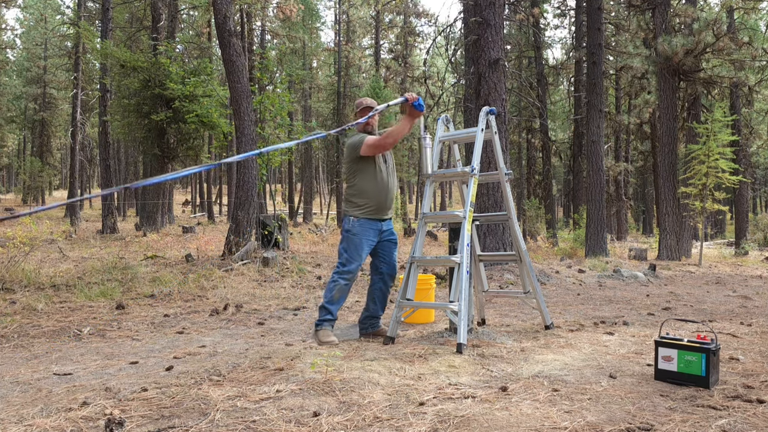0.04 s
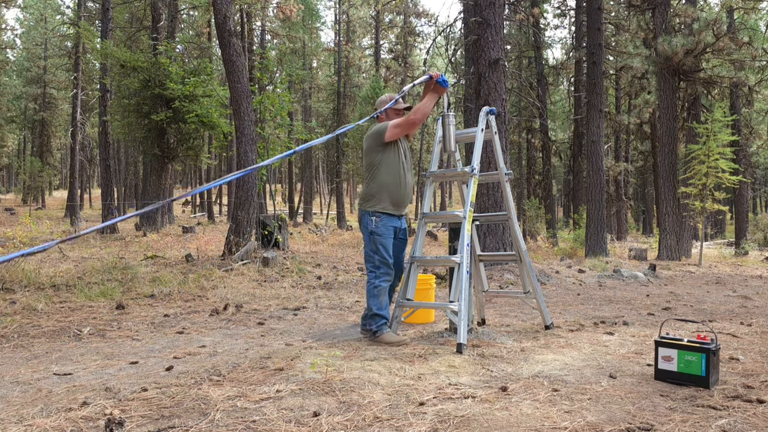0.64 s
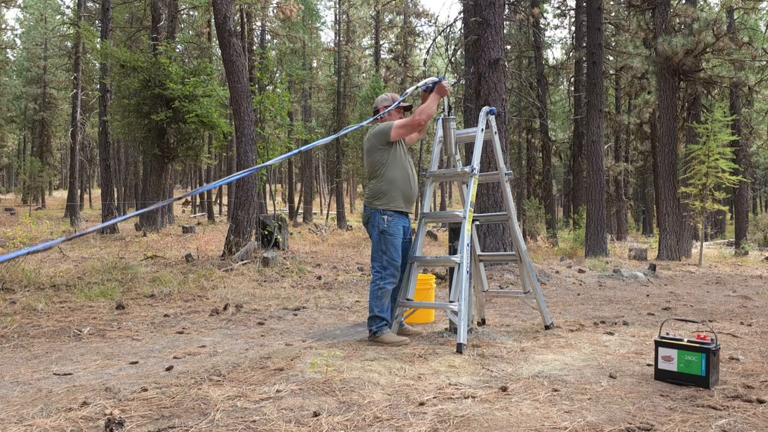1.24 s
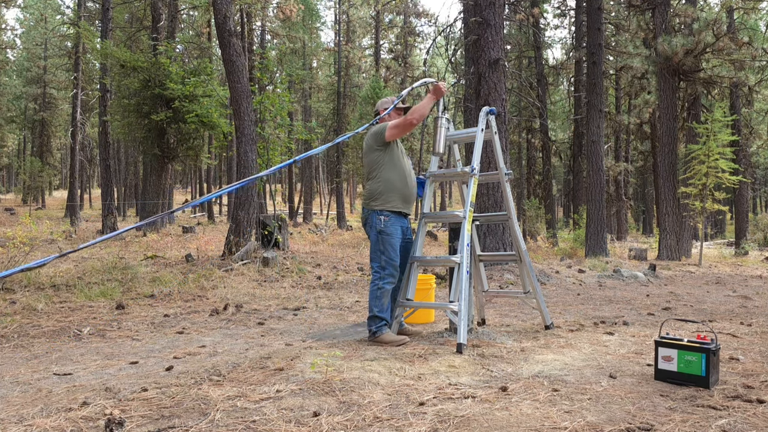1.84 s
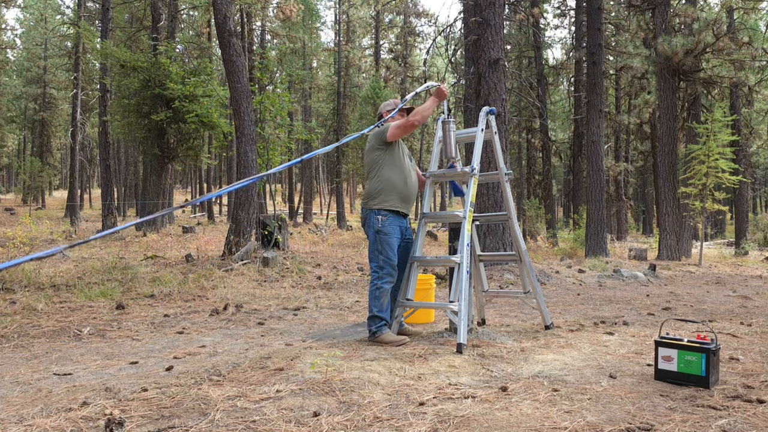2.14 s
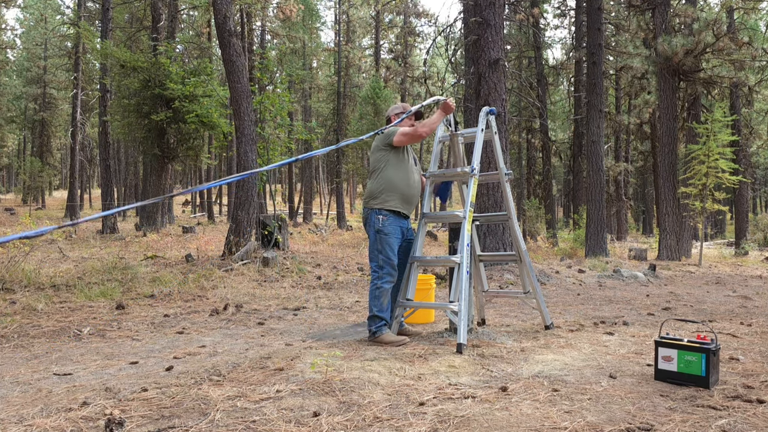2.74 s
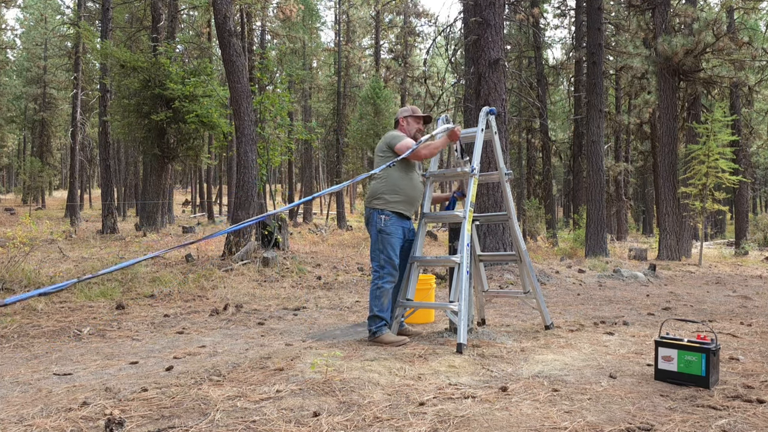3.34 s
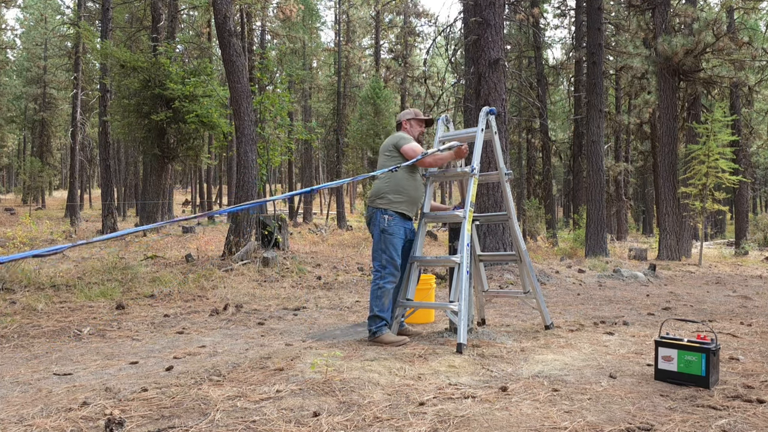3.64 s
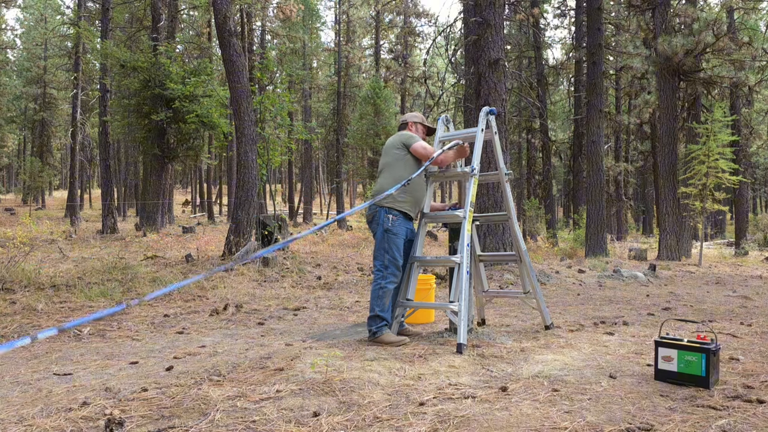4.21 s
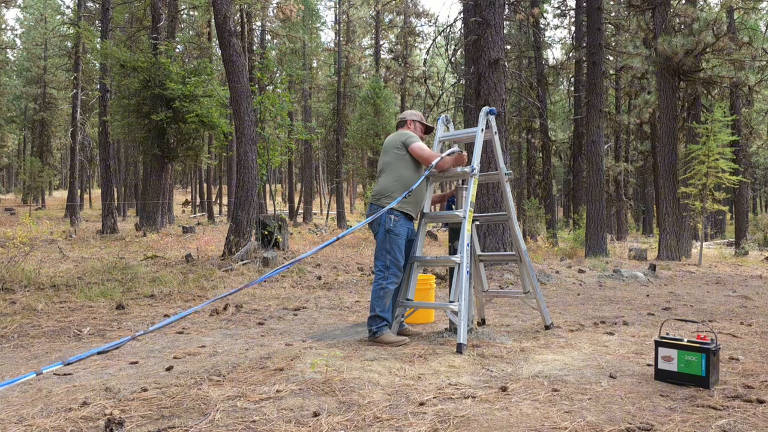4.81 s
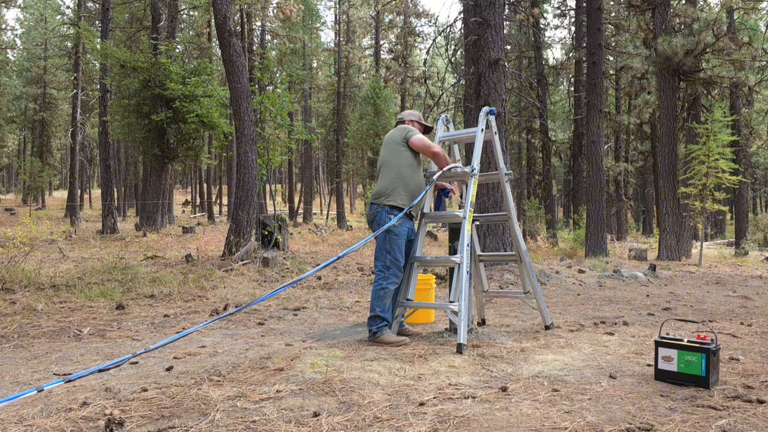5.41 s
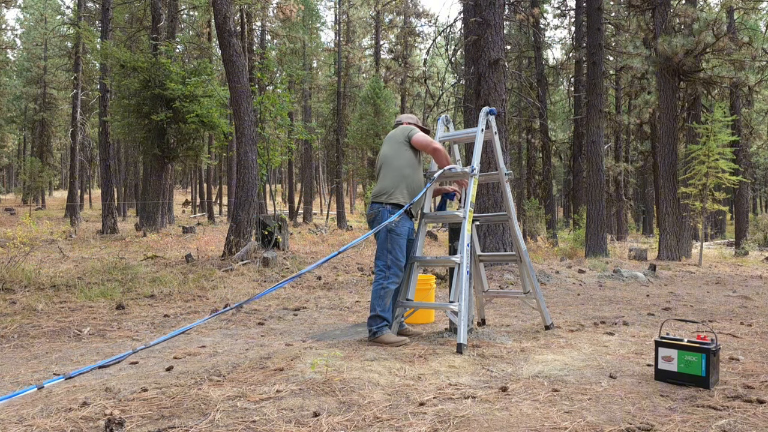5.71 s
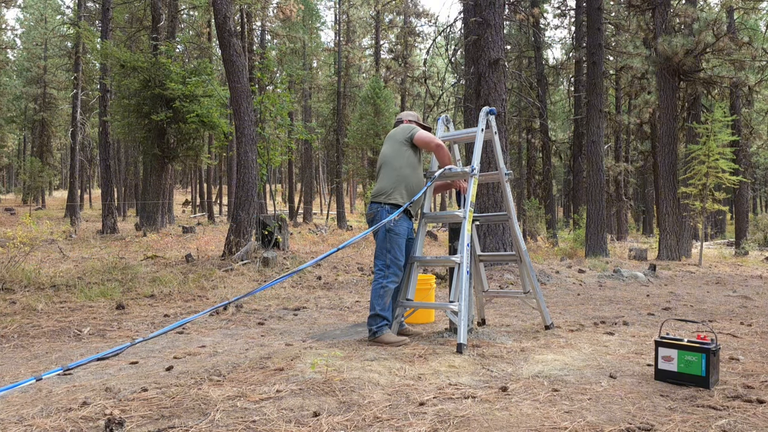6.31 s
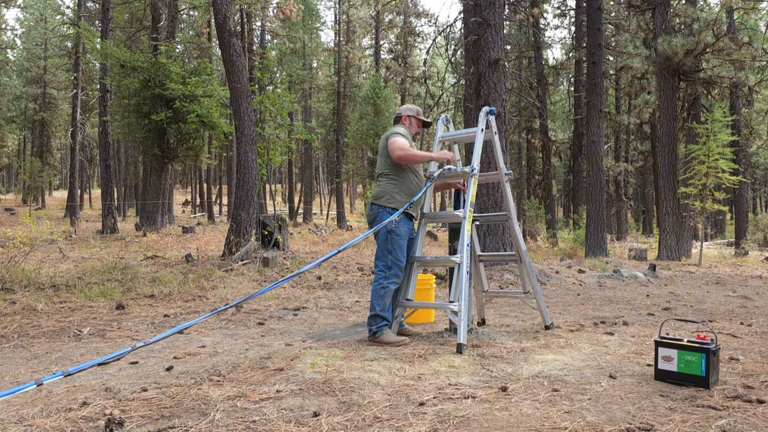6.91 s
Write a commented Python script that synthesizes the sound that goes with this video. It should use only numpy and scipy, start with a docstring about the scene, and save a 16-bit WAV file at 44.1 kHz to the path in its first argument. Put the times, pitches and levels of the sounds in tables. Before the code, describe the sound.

In a quiet forest with low wind, a hose is fed into a steel well pipe a few metres away and a little left of the microphone. Its fittings first strike an aluminium ladder, once hard and then in a lighter clatter, with faint hose swishes, squeaks and a boot scuff around them. Then the pipe rings with a clank and light clinks, and the air inside booms softly. The trees return a thin echo.

```python
"""Fittings clack on an aluminium ladder as a hose and cable bundle is fed by hand into a steel well casing.
They clink and rub on the casing, whose air column booms softly; the hose swishes and squeaks as it slides.
The well is in a pine forest, a few metres from a stereo microphone and a little to the left.
A boot scuffs the dry ground, the trunks throw back a thin echo, and low wind lies under everything."""
import sys
import numpy as np
from scipy import signal
from scipy.fft import rfft, irfft, next_fast_len
from scipy.io import wavfile

SR = 44100
rng = np.random.default_rng(int(sys.argv[2]) if len(sys.argv) > 2 else 0)


def generate_wav(sig):
    """Save sig (samples, or channels by samples) to the path in sys.argv[1] as 16-bit PCM at SR."""
    pcm = np.round(np.clip(np.atleast_2d(sig).T, -1, 1) * 32767).astype(np.int16)
    wavfile.write(sys.argv[1], SR, pcm)


N = 311346

# left-right likeness at the microphone, for near and for diffuse sound: f/Hz, correlation
NEAR = [(100, 0.97), (1200, 0.77), (3000, .82), (7000, 1), (14000, 0.18)]
DIFFUSE = [(60, 0.98), (300, 0.84), (1000, 0.44), (3000, .15), (12000, 0.05)]
# bending modes of the steel casing: f/Hz, level/dB, t60/s
CASING_MODES = [(614, -1, 0.44), (779.7, 2.5, 0.031), (1043, 2.5, 0.036), (1234, -7.5, 0.088),
                (1330, -30, 0.097), (1743, -1.5, 0.23), (2253, -22, 0.14), (2490, -31, 0.15),
                (3280, -14, 0.1), (4080, -39, 0.14), (5210, -22.5, 0.18), (6110, -50, .12),
                (7400, -37, 0.29), (8500, -29.5, 0.19), (9800, -38, 0.14)]


def from_db(db):
    return 10 ** (np.asarray(db) / 20)


def rms_one(x):
    return x / np.sqrt(np.mean(x ** 2) + 1e-20)


def unit_attack(sound, size=500):
    """Scale a blow so that its first samples have rms 1."""
    return sound / np.sqrt(np.mean(sound[..., :size] ** 2) + 1e-20)


def at_hz(points, hz):
    """Read a curve on a log-frequency axis."""
    freqs, values = np.transpose(points)
    return np.interp(np.log(hz), np.log(freqs), values)


def drift(rate_hz):
    """Random wander with a spread near 1."""
    knots = rng.standard_normal(int(N / SR * rate_hz) + 2)
    return np.interp(np.arange(N) / SR * rate_hz, np.arange(len(knots)), knots)


def dying(t, t60):
    return np.exp(-np.log(1000) * t / np.maximum(t60, 1e-3))


def stroke(s, rise_s, fall_s):
    """Speed of a slide, 0 to 1: it gathers up to time s, then dies down."""
    t = np.arange(N) / SR - s
    return np.exp(-np.minimum((t / np.where(t < 0, rise_s, fall_s)) ** 2, 20))


def add(out, s, sound):
    """Mix a sound in at time s."""
    i = max(int(s * SR), 0)
    out[:, i:i + sound.shape[-1]] += sound[..., :N - i]


def stereo(mid, side, alike):
    """Left and right with the given correlation."""
    return np.sqrt(1 + alike) * mid + np.sqrt(1 - alike) * side * [[1], [-1]]


def noise_bands(length, likeness):
    """Half-octave bands of stereo noise: centres in Hz, bands."""
    edges = 15.5 * 2 ** np.arange(0, 10.1, .5)
    centres = np.sqrt(edges[:-1] * edges[1:])
    white = rng.standard_normal((2, 2, length + 4000))
    bands = []
    for k, hz in enumerate(centres):
        bandpass = signal.butter(2, edges[k:k + 2], "band", fs=SR, output="sos")
        mid, side = signal.sosfilt(bandpass, white[k % 2])[:, -length:]
        bands.append(stereo(mid, side, at_hz(likeness, hz)))
    return centres, np.array(bands)


def steady_noise(spectrum, likeness):
    """Coloured stereo noise, rms 1."""
    size = next_fast_len(N, True)
    hz = np.maximum(np.arange(size // 2 + 1) * SR / size, 1)
    rolloff = np.minimum(1, spectrum[-1][0] / hz) ** 2
    mid, side = rfft(rng.standard_normal((2, size))) * from_db(at_hz(spectrum, hz)) * rolloff
    return rms_one(irfft(stereo(mid, side, at_hz(likeness, hz)), size)[:, :N])


def narrow_noise(hz, width_hz, apart=0.65):
    """Stereo noise around a moving pitch."""
    lowpass = signal.butter(2, width_hz / 2, fs=SR, output="sos")
    slow = signal.sosfilt(lowpass, rng.standard_normal((2, 2, len(hz))))
    phase = 2 * np.pi * np.cumsum(hz) / SR
    mid, side = slow[0] * np.cos(phase) + slow[1] * np.sin(phase)
    return rms_one(mid + apart * side * [[1], [-1]])


def resonance(x, hz, width_hz):
    r = np.exp(-np.pi * width_hz / SR)
    return signal.lfilter([1 - r, 0, r - 1], [1, -2 * r * np.cos(2 * np.pi * hz / SR), r * r], x)


def softness_db(hz, limit_hz):
    """A contact of finite length cannot excite the highest tones."""
    return -10 * np.log10(1 + (hz / limit_hz) ** 6)


def struck(modes, t, colour, scatter_db):
    """Modes ring as dying sines; the point of contact changes their strengths and signs."""
    hz, db, t60 = np.transpose(modes)
    gain = from_db(db + colour(hz) + scatter_db * rng.standard_normal(len(hz)))
    gain *= rng.choice([-1, 1], len(hz))
    rings = np.sin(2 * np.pi * hz[:, None] * t) * dying(t, t60[:, None])
    return gain @ rings / np.linalg.norm(gain)


def wind(rumble_db=-66.5, rumble_follows=0.11, air_db=-83):
    """All round the microphone: lumpy rumble, a hollow rush of wandering pitch and faint hiss."""
    # course of the rush: t/s, level/dB, centre f/Hz
    gusts = [(0.05, -62.5, 261.5), (0.25, -64, 267), (0.49, -70.5, 268.9), (0.93, -66.5, 293.9),
             (1.65, -73.5, 293.7), (2.01, -66, 299.8), (2.41, -65.5, 293.3), (2.73, -72, 274),
             (3.29, -72, 276), (3.53, -66, 260), (3.89, -65.5, 239.6), (4.49, -75, 280.2),
             (4.77, -71, 269.9), (5.13, -75.5, 276.2), (5.45, -68, 262), (5.77, -74.5, 269.2),
             (6.13, -68.5, 236), (7.01, -68, 267.5)]
    # spectra of rumble, rush and still air: f/Hz, density/dB
    rumble_spectrum = [(20, -7), (35, -3), (60, 1), (90, 0.5), (130, -12.5), (190, -22), (400, -45)]
    rush_spectrum = [(100, -13.5), (170, -8.5), (220, 0), (300, 1), (370, -3.5), (450, -15.5), (600, -27),
                     (1200, -49)]
    air_spectrum = [(260, -31.5), (450, -2.5), (889, -9), (1160, -12.5), (1390, -11), (1860, -12),
                    (2620, -17.5), (3320, -17), (9090, -28.5), (15500, -25.5)]
    times, *curves = np.transpose(gusts)
    rush_db, rush_hz = [np.interp(np.arange(N) / SR, times, curve) for curve in curves]
    swing_db = rumble_follows * (rush_db - rush_db.mean()) + 3 * drift(12)
    rumble = from_db(rumble_db + swing_db) * steady_noise(rumble_spectrum, DIFFUSE)
    broad = from_db(-3) * steady_noise(rush_spectrum, DIFFUSE)
    hollow = from_db(-4) * narrow_noise(rush_hz + 18 * drift(7.4), width_hz=78, apart=0.19)
    rush = from_db(rush_db + 2 * drift(18)) * (broad + hollow)
    air = from_db(air_db) * steady_noise(air_spectrum, DIFFUSE)
    return (rumble + rush + air) * from_db([[.5], [-.5]])


def forest(x, echo_db=-27, build_s=.05, trunk_s=.1, trunk_db=5):
    """Scattered echoes from the trunks build up, bunch once and fade, treble first."""
    # colour of the echo: f/Hz, density/dB
    spectrum = [(150, -7), (500, -1), (1100, -2), (2600, -2), (3600, 0.5), (7000, 1.5), (14000, -2.5)]
    # its decay: f/Hz, t60/s
    decay = [(200, 1), (1000, 0.92), (3000, 0.82), (6000, .52), (14000, .36)]
    t = np.arange(SR) / SR
    tail = sum(band * from_db(at_hz(spectrum, hz)) * dying(t, at_hz(decay, hz))
               for hz, band in zip(*noise_bands(SR, DIFFUSE)))
    tail *= 1 - np.exp(-t / build_s)
    tail *= from_db(trunk_db * np.exp(-((t - trunk_s) / 0.011) ** 2))
    tail /= np.sqrt(np.sum(tail ** 2) / 2)
    return from_db(echo_db) * signal.fftconvolve(x.mean(axis=0)[None], tail, axes=1)[:, :N]


def boot():
    """A sole grinds on soil and crushes dry needles."""
    # scuffs: fastest at t/s, sole level/dB, needle level/dB
    scuffs = [(0.974, -61.5, -77), (1.065, -72, -85)]
    # spectra of sole and needles: f/Hz, density/dB
    sole_spectrum = [(200, -17), (400, 5.5), (750, 1.5), (1300, -16.5), (2500, -25.5), (8000, -27)]
    needle_spectrum = [(500, -27), (1500, 7), (3200, 4), (5000, -28), (9000, -26), (15000, -34)]
    sole = from_db(2.2 * drift(60.24)) * steady_noise(sole_spectrum, NEAR)
    needles = from_db(3.1 * drift(250)) * steady_noise(needle_spectrum, NEAR)
    return sum(stroke(s, 0.031, 0.044) * (from_db(sole_db) * sole + from_db(needle_db) * needles)
               for s, sole_db, needle_db in scuffs)


def rubbing():
    """A fitting's friction keeps the casing's upper tones singing, now one and now another."""
    # rubs: fastest at t/s, level/dB
    rubs = [(6.485, -76), (6.545, -80), (6.67, -84.5)]
    level = sum(from_db(db) * stroke(s, 0.031, 0.032) for s, db in rubs)
    grit = steady_noise([(1000, 0), (8600, -1), (10000, -9.5), (15000, -15)], NEAR)
    grit *= from_db(2.2 * drift(61))
    tones = np.zeros((2, N))
    for hz, db, _ in CASING_MODES:
        if hz > 2400:
            tone_db = 0.12 * db - 5.6 * np.log2(hz / 1000) + 2.9 * drift(9.4)
            tones += from_db(tone_db) * resonance(grit, hz, width_hz=60)
    return level * rms_one(tones)


def couplings():
    """A light touch leaves a small coupling ringing with one thin tone."""
    # touches: t/s, level/dB, f/Hz, t60/s
    pings = [(1.555, -72.5, 8090, .1), (2.280, -77.5, 4090, 0.19), (2.349, -65.5, 4910, 0.066),
             (3.090, -64, 8480, 0.051), (3.155, -77.5, 8460, 0.052), (5.484, -70, 5250, 0.21),
             (5.653, -67.5, 5266, 0.22)]
    out, t = np.zeros((2, N)), np.arange(SR // 4) / SR
    for s, db, hz, t60 in pings:
        add(out, s, from_db(db) * np.sin(2 * np.pi * hz * t) * dying(t, t60) * (1 - dying(t, 0.008)))
    return out


def hose(hiss_db=-4.5, pitch_exponent=0.068):
    """The sliding hose swishes in gritty slips, higher as it speeds up, and squeaks where it catches."""
    # short pulls: fastest at t/s, level/dB, rise/s, fall/s, swish f/Hz at full speed
    pulls = [(0.049, -78, .1, 0.073, 5620), (0.195, -77.5, .05, 0.047, 4200),
             (0.335, -73, 0.09, 0.059, 6850), (2.2, -89.5, .2, 0.073, 4772), (3.92, -84, .12, .03, 4810),
             (4.035, -72, 0.064, 0.15, 7010), (4.268, -69, .004, 0.014, 8590)]
    # catches: t/s, relative level/dB, f/Hz, length/s
    squeaks = [(0.009, -66.5, 6100, 0.021), (0.07, -60, 5730, 0.02), (0.167, -62.5, 4140, 0.012),
               (0.217, -66.5, 3750, 0.014), (0.69, -70.5, 7000, 0.0074), (1.414, -72, 6100, .008),
               (3.942, -72.5, 3090, 0.024), (4.056, -64, 5460, 0.0052), (4.079, -61.5, 3820, 0.011),
               (4.114, -65, 3900, 0.011), (4.366, -71.5, 3475, 0.021)]
    out, t = np.zeros((2, N)), np.arange(SR // 8) / SR
    hiss_spectrum = [(600, -13), (3000, -2.5), (7000, 0), (9500, -3), (15000, -3)]
    hiss = from_db(hiss_db) * steady_noise(hiss_spectrum, NEAR)
    slips_db = 1.5 * drift(84) + 2 * drift(690)
    for s, db, rise_s, fall_s, hz in pulls:
        speed = stroke(s, rise_s, fall_s)
        moving = np.flatnonzero(speed > .001)
        swish = narrow_noise(hz * speed[moving] ** pitch_exponent, width_hz=1700)
        out[:, moving] += from_db(db + slips_db[moving]) * speed[moving] * (swish + hiss[:, moving])
    for s, db, hz, length in squeaks:
        age = 3 * t / length
        squeak = narrow_noise(hz * (1 + 0.3 * t), width_hz=800)
        add(out, s, from_db(db - 10) * age * np.exp(1 - age) * squeak)
    return out


def air_column(pipe_hz=64.5, boom_t60=0.36, thud_db=-10.5, thud_t60=.12):
    """The bundle bumps inside the casing, thuds dully and sets the air in the well booming."""
    # bumps: t/s, level/dB
    bumps = [(2.699, -54.5), (4.654, -44), (5.463, -53), (5.967, -53.5), (6.527, -46.5), (7.009, -56.5)]
    # their thud: f/Hz, density/dB
    thud_spectrum = [(50, -16), (110, -1.5), (200, -1), (320, -13), (700, -33), (2000, -60)]
    out, t = np.zeros((2, N)), np.arange(SR // 2) / SR
    boom = np.sin(2 * np.pi * pipe_hz * t) * dying(t, boom_t60) * (1 - dying(t, 0.046))
    dull = steady_noise(thud_spectrum, NEAR)
    for s, db in bumps:
        i = rng.integers(SR * 5)
        thud = unit_attack(dull[:, i:i + len(t)] * dying(t, thud_t60) * (1 - dying(t, 0.01)), size=900)
        add(out, s, from_db(db) * (boom + from_db(thud_db) * thud))
    return out


def casing():
    """Fittings touch the steel pipe: a short crack and a few clear bending tones."""
    # contacts: t/s, relative level/dB, tilt/(dB per octave), crack trim/dB, treble limit f/Hz
    clinks = [(4.654, -26.5, -2.5, 0, 13000), (5.322, -54, 8, 5.5, 4030), (5.340, -47.5, 7.5, 0.5, 8020),
              (5.37, -57.5, 8.5, 5, 11000), (5.457, -57, 3, 7.5, 6050), (5.480, -53, 8, -0.5, 10960),
              (5.503, -60, 3, 6.5, 10100), (5.652, -60.5, 7, 5, 7030), (5.689, -61.5, 4, 1, 4005),
              (6.528, -58, 4.5, -2, 3980)]
    # their crack: f/Hz, density/dB
    crack_spectrum = [(150, -35), (350, -9), (600, 4), (1000, -0.5), (1800, -3), (2600, -42), (3400, -19.5),
                      (4500, -29), (10000, -32.5), (15000, -56)]
    out, t = np.zeros((2, N)), np.arange(SR * 3 // 4) / SR
    brief = t[:SR // 8]
    envelope = dying(brief, 0.07) * (1 - dying(brief, 0.0072))
    centres, bands = noise_bands(SR * 5 // 4, NEAR)
    for s, db, tilt, crack_db, limit_hz in clinks:
        def colour(hz):
            return tilt * np.log2(np.maximum(hz, 900) / 1000) + softness_db(hz, limit_hz)
        i = rng.integers(SR)
        gains = from_db(at_hz(crack_spectrum, centres) + colour(centres))
        crack = np.tensordot(gains, bands[..., i:i + len(brief)], 1)
        add(out, s, from_db(db - 18 + crack_db) * unit_attack(crack * envelope))
        add(out, s, from_db(db - 8.5) * struck(CASING_MODES, t, colour, scatter_db=2))
    return out


def ladder(crack_s=0.0068, crack_gain=2.3, rung_db=-7, buzz_db=-3):
    """Fittings hit the ladder: a hard crack, then hollow rails and thin rungs ring and loose joints buzz."""
    # blows: t/s, relative level/dB, tilt/(dB per octave), rail ring/dB, low body/dB, treble limit f/Hz
    knocks = [(0.3508, -10.5, 0, 1, -6, 17900), (0.374, -22.5, 0, 0, 5.5, 16000),
              (0.451, -45.5, 4, -5, -6, 17000), (0.649, -53.5, 5, -7, 27.5, 14990),
              (1.600, -70, 5, -1.5, -3, 12000), (2.251, -53, 4.5, 4, 14, 10040),
              (2.282, -61, 5, 8, 5, 4500), (2.841, -39, 0.5, 3, 10.5, 8980),
              (2.850, -35.5, -1, -0.5, 1.5, 9000), (2.882, -45.5, -0.5, 5, 1, 6000),
              (2.928, -56, -0.5, 6, 2, 5000), (3.026, -29.5, 0.5, -3, 16, 9530),
              (3.054, -35, 1.1, 2, 14, 8030), (3.104, -44, -1, 2, 11, 5950), (4.135, -57, 5, 1, 8, 4500),
              (4.186, -64, 9.5, -1, 3.5, 3803)]
    # modes of the rails: f/Hz, level/dB, t60/s
    rail_modes = [(454, -29, 0.18), (622, -21, .28), (694.8, -16, .45), (743.4, -12, 0.19),
                  (836, -12, 0.13), (880, -8, 0.13), (922, -13, .32), (970, -7.5, 0.19), (1062, -15, .18),
                  (1101, -0.5, 0.15), (1190, -4.5, 0.14), (1280.4, -7, 0.16), (1406, -8, .17),
                  (1760, -18.5, 0.16), (1903, -18.5, 0.41), (2080, -20, 0.11), (2227, -15, 0.16),
                  (2527, -20, 0.34), (3030, -22.5, 0.24), (3284, -17.5, 0.27), (3430, -19.5, 0.18),
                  (3520, -16, .18), (3960, -24, 0.2), (4081, -28.5, 0.18), (4620, -17, 0.11),
                  (5030, -25, 0.26), (7550, -31, 0.16), (7600, -27, 0.2), (8860, -30, 0.26)]
    # clatter of rungs and joints: f/Hz, density/dB
    clatter = [(100, -26.5), (200, -21.5), (330, -24), (560, -22), (820, -5.5), (1150, -5.5), (1700, -13),
               (2600, -19), (3400, -18.5), (4700, -23), (7500, -27), (10500, -35.5), (15500, -37)]
    # its decay: f/Hz, t60/s
    decay = [(200, .16), (1000, 0.14), (2500, 0.14), (6000, 0.12), (14000, .17)]
    out, t = np.zeros((2, N)), np.arange(SR * 2 // 5) / SR
    # the rungs' weaker modes lie unevenly and thin out towards the treble
    pitches = np.geomspace(1400, 12000, num=48) * (1 + .015 * rng.standard_normal(48))
    levels_db = at_hz(clatter, pitches) + 10 * np.log10(pitches / 1000)
    rung_modes = np.transpose([pitches, levels_db, at_hz(decay, pitches)])
    centres, bands = noise_bands(SR * 2, NEAR)
    fades = dying(t, at_hz(decay, centres)[:, None])
    for s, db, tilt, rail_db, body_db, limit_hz in knocks:
        def colour(hz):
            body = body_db / (1 + (hz / 900) ** 6)
            return tilt * np.log2(hz / 1000) + body + softness_db(hz, limit_hz)
        i = rng.integers(SR)
        gains = from_db(at_hz(clatter, centres) + colour(centres))[:, None] * fades
        buzz = from_db(buzz_db) * unit_attack(np.einsum("bct,bt->ct", bands[..., i:i + len(t)], gains))
        rails = from_db(rail_db) * struck(rail_modes, t, colour, scatter_db=0.5)
        rungs = from_db(rung_db) * struck(rung_modes, t, colour, scatter_db=4.5)
        # only a heavy blow stands far above its own ringing
        crack = 1 + crack_gain * from_db(min(db + 9.5, 0)) * np.exp(-(t / crack_s) ** 2)
        blow = (buzz + rails + rungs) * crack * (1 - dying(t, 0.0021))
        add(out, s, from_db(db - 10) * unit_attack(blow))
    return out


def placed(x):
    """The work is a little louder in the left channel and arrives there one sample later."""
    # balance at the microphone: f/Hz, left-minus-right level/dB
    balance = [(100, 0), (400, 2.5), (800, 5), (1300, 1.5), (2400, 3.5), (4500, 1.7), (15000, 2.5)]
    hz = np.maximum(np.arange(N // 2 + 1) * SR / N, 1)
    half_db = at_hz(balance, hz) / 2
    left, right = irfft(rfft(x) * from_db([half_db, -half_db]), N)
    return np.array([np.pad(left, (1, 0))[:N], right])


def scene():
    """All the handling happens at the well, a few metres from the microphone among the trees."""
    work = ladder() + casing() + couplings() + rubbing() + hose() + boot()
    return placed(work) + forest(work) + air_column() + wind()


def record(dry, cutoff_hz=15900):
    """A steep low-pass cuts the top of both channels."""
    return signal.sosfilt(signal.ellip(10, .1, 80, cutoff_hz, fs=SR, output="sos"), dry)


dry = scene()
out = record(dry)
generate_wav(out)
```